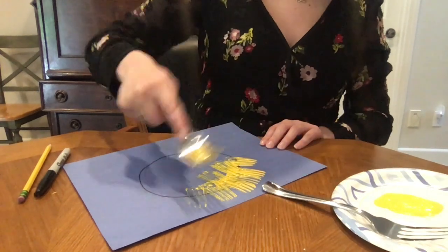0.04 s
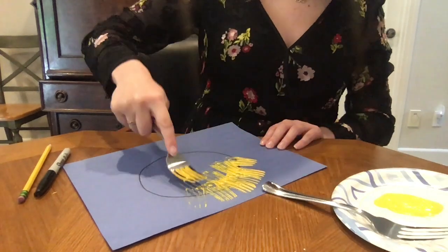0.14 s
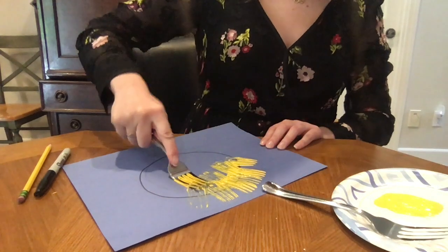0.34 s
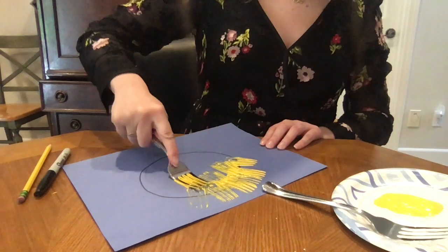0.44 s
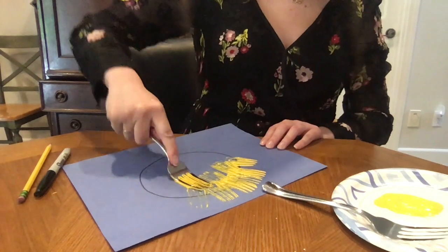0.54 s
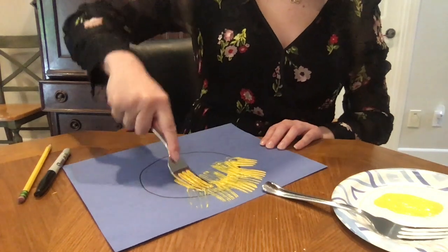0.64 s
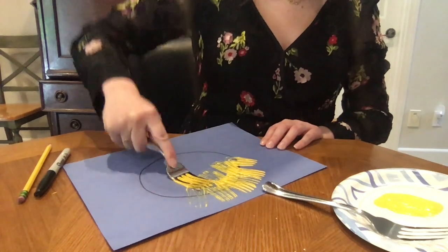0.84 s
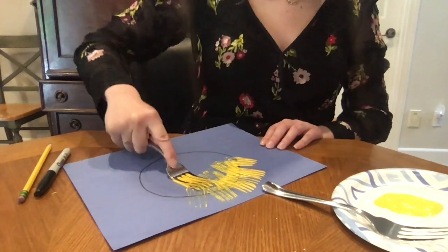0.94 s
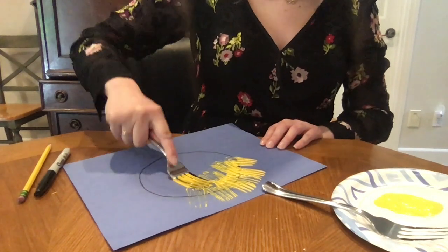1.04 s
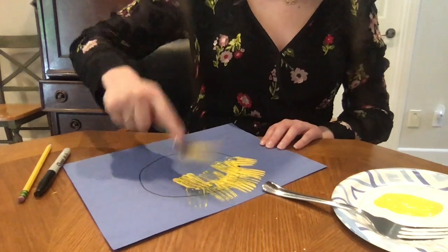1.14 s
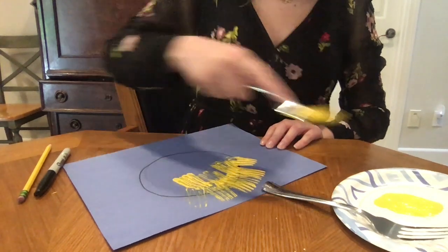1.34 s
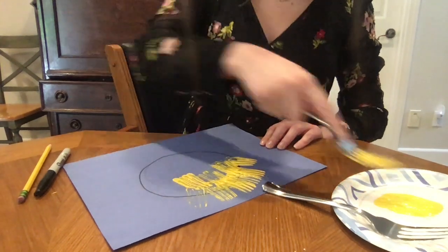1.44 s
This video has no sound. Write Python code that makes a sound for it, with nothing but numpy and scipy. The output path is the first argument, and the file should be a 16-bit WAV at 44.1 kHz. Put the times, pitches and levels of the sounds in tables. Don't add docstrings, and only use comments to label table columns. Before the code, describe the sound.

A paint-covered fork stamps through paper onto a wooden table at 0.22 s: a firm, short woody knock, softer tine touches within 0.03 s, and a faint ring of table and dishes. Much quieter, sticky paint peels in bright, fizzy crackles around 0.59, 0.8 and 1.07 s, with dull paper brushes near the last two. Close microphone, short room reflections, low ventilation rumble, barely audible sleeve rustle.

```python
import sys
import numpy as np
from scipy import signal
from scipy.fft import rfft, irfft, next_fast_len
from scipy.io import wavfile
from scipy.ndimage import uniform_filter1d, map_coordinates

SR = 44100
rng = np.random.default_rng(int(sys.argv[2]) if len(sys.argv) > 2 else 0)


def master(y):
    cut = np.clip(np.atleast_2d(y).T, -1, 1)
    pcm = np.round(cut * 32767)
    wavfile.write(sys.argv[1], SR, pcm.astype(np.int16))


def undo_db(level):
    steps = np.asarray(level, float) / 20
    return 10 ** steps


N = 66150
T = np.arange(N) / SR

# (f/Hz, density/dB per Hz)
RUMBLE_COLOUR = [(15, -36.5), (30, -17), (55, 1), (86, -5.5), (125, -1), (300, -6.5), (520, -16),
                 (900, -19.5)]
# (f/Hz, density/dB per Hz)
AIR_COLOUR = [(500, -29), (1000, -1), (1900, -7), (2500, -16.5), (3300, -26.5), (5000, -32), (14500, -30),
              (16000, -26)]
# (middle t/s, length t/s, level/dB)
SLEEVE_MOVES = [(.01, 0.062, -99), (.09, 0.017, -101), (.28, 0.023, -100), (.365, 0.022, -100),
                (.55, .04, -97), (1.337, 0.032, -101), (1.453, 0.082, -97.5)]
# (f/Hz, t60/s)
ROOM_DECAY = [(100, 0.35), (500, 0.26), (1300, .3), (2000, 0.29), (5000, 0.34), (14000, 0.5)]
# (f/Hz, level/dB)
WALL_COLOUR = [(80, -7.5), (230, 2), (520, 4), (1200, 3.5), (1800, -4.5), (3200, 6), (6000, -4)]
# (middle t/s, length t/s, level/dB, centre f/Hz)
FORK_SHIFTS = [
    (0.818, 0.024, -76.5, 1750),
    (1.081, 0.015, -68.5, 424),
]
# (start t/s, hold t/s, level/dB, release t60/s, low-end share level/dB)
PEELS = [
    (0.516, 0.014, -91.5, 0.13, -2),
    (0.592, 0.068, -72.5, 0.12, -6),
    (0.676, 0.24, -96, 0.25, -20),
    (0.8, 0.043, -77.5, 0.12, 1),
    (0.854, 0.016, -81, 0.18, -9),
    (1.068, 0.017, -71, 0.14, 0),
]
# (t/s, peak level/dB, lowest strong f/Hz)
PAINT_SNAPS = [(.5238, -65.5, 13600), (.5875, -70, 9000), (.5931, -48.5, 13300), (0.595, -58, 9050),
               (0.6098, -58, 9200), (.646, -58.5, 12000), (.655, -63, 7100), (.7945, -73, 3900),
               (.7995, -79, 12000), (.8105, -60, 12000), (.8186, -62.5, 4000), (.8233, -60, 13000),
               (.8545, -66, 13400), (.872, -63, 12000), (0.905, -74, 11000), (0.9074, -65, 11000),
               (1.0585, -73, 6950), (1.062, -56, 8100), (1.0652, -51, 10000), (1.072, -55, 11000),
               (1.0772, -51, 10000)]
# (f/Hz, density/dB per Hz)
PAINT_COLOUR = [(1200, -48), (1900, -9), (3700, -11.5), (5200, -16), (6200, -7.5), (11000, 1.5),
                (15300, 1.5), (16100, -29)]
# (f/Hz, width f/Hz, level/dB)
TINE_RESONANCES = [(1750, 650, -8), (5060, 610, -10)]
# (t/s, level/dB, brightness of the fork modes level/dB)
CONTACTS = [
    (.21862, 0, 0),
    (.23057, -13.5, -17),
    (.2525, -24, -20),
]
# (f/Hz, level/dB, t60/s, side of the nodal line +-1)
TABLE_MODES = [(141, -29, .074, 1), (214, -16, .019, -1), (274, -37, .17, 1), (375, -19, .022, 1),
               (434, -29, .053, 1), (512, -38, .062, 1), (708, -42, .1, -1), (947, -20, .01, 1),
               (1116, -28, .01, 1)]
# (f/Hz, level/dB, t60/s, side of the nodal line +-1)
FORK_MODES = [(1287, -30, .01, 1), (1577, -28, .017, -1), (1706, -22, .014, -1), (1883, -21, .01, 1),
              (2106, -27, .014, -1), (2644, -41, .016, -1)]
# (f/Hz, level/dB, t60/s, side -1 to 1)
DISH_MODES = [(223.3, -42, 0.16, 1), (256, -42.5, .14, 1), (804, -54.5, 0.13, 0.9),
              (497.6, -46.5, 0.18, 0.89), (543, -48.5, 0.19, -0.67), (1380, -55.5, 0.1, 0.56)]
# (f/Hz, level/dB)
CRACK_COLOUR = [(1500, -5.5), (3300, 14.5), (4300, -4), (8000, -2), (15500, 0)]


def unit(x):
    return x / np.sqrt(np.mean(x ** 2) + 1e-20)


def along(points, hz):
    f, value = np.transpose(points)
    return np.interp(np.log(hz + 1), np.log(f + 1), value)


def filtered(x, gain):
    m = next_fast_len(N + 8192)
    return irfft(rfft(x, m) * gain(np.fft.rfftfreq(m, 1 / SR)), m)[:N]


def noise_through(gain):
    return unit(filtered(rng.standard_normal(N), gain))


def wobble(rate):
    return map_coordinates(rng.standard_normal(200), [T * rate])


def bumps(moves):
    return sum(undo_db(db) * np.exp(-((T - s) / length) ** 2) for s, length, db in moves)


def room_tone():
    rumble = noise_through(lambda hz: undo_db(along(RUMBLE_COLOUR, hz)) / (1 + (hz / 1100) ** 4))
    air = noise_through(lambda hz: undo_db(along(AIR_COLOUR, hz)) * (hz > 300))
    return undo_db(-62) * rumble + undo_db(-80 + 1.2 * wobble(5.1)) * air


def sleeve():
    cloth = noise_through(lambda hz: (hz < 15800) / (1 + (11000 / (hz + 1)) ** 4))
    return bumps(SLEEVE_MOVES) * undo_db(5.5 * wobble(40)) * cloth


def room(x):
    delay_s = 0.0095
    hz, t, z = signal.stft(rng.standard_normal(SR // 2), SR, nperseg=256)
    decay_db = -60 * t / along(ROOM_DECAY, hz)[:, None]
    tail = signal.istft(z * undo_db(decay_db), SR, nperseg=256)[1]
    x = filtered(x, lambda f: undo_db(along(WALL_COLOUR, f)))
    delayed = np.pad(x, (round(delay_s * SR), 0))
    return signal.fftconvolve(delayed, tail / np.linalg.norm(tail))[:N]


def fork_shifts():
    out = np.zeros(N)
    for s, length, db, centre in FORK_SHIFTS:
        brush = noise_through(lambda hz: 1 / (1 + ((hz - centre) / (0.3 * centre) * 2) ** 2))
        out += bumps([(s, length, db)]) * brush
    return out


def paint_pops():
    pops_per_s, spread_db, pop_cycles = 1400, 6, 5.6
    sizes = undo_db(spread_db * rng.standard_normal(N).clip(-3, 1.5))
    hits = (rng.random(N) < pops_per_s / SR) * sizes
    life = np.exp(-T[:120] * 30000 / pop_cycles)
    power = signal.fftconvolve(hits ** 2, life ** 2)[:N].clip(0)
    return unit(np.sqrt(power) * rng.standard_normal(N))


def tine_gain(hz):
    return sum(undo_db(db) / (1 + ((hz - centre) / width * 2) ** 2) * np.sqrt(SR / width / 4)
               for centre, width, db in TINE_RESONANCES)


def peels():
    low_hz, mid_hz, hiss_db, rise_s = 6100, 10000, -6, 0.005
    low_fade_rate, mid_fades_faster = 1, 1.05
    tines_grow, tines_fade_db_per_s = 2, 60
    pops = paint_pops()
    active = sum((T < s + hold) * (T > s - hold) * 1. for s, hold, *_ in PEELS).clip(0, 1)
    hiss_share = undo_db(hiss_db) ** uniform_filter1d(active, size=800)
    raw = np.sqrt(1 - hiss_share.clip(0, 1) ** 2) * pops + hiss_share * rng.standard_normal(N)
    raw = unit(filtered(raw, lambda hz: undo_db(along(PAINT_COLOUR, hz))))
    low = filtered(raw, lambda hz: 1 / (1 + (hz / low_hz) ** 6))
    below_mid = filtered(raw, lambda hz: 1 / (1 + (hz / mid_hz) ** 6))
    tines = filtered(unit(pops + rng.standard_normal(N)), tine_gain)
    out = np.zeros(N)
    for s, hold, db, t60, low_db in PEELS:
        rise = np.exp(np.minimum(T - s, 0) / rise_s)
        fall_db = -60 * np.maximum(T - s - hold, 0) / t60
        tine_fade_db = tines_fade_db_per_s * np.maximum(T - s - .02, 0)
        peel = undo_db(fall_db) * (raw - below_mid)
        peel += undo_db(low_db / 2 + mid_fades_faster * fall_db) * (below_mid - low)
        peel += undo_db(low_db + low_fade_rate * fall_db) * low
        peel += undo_db(tines_grow * low_db + fall_db - tine_fade_db) * tines
        out += rise * undo_db(db) * peel
    return out


def snaps():
    t60_s, gain_db = .0055, 0.5
    out, t = np.zeros(N), T[:400]
    for s, db, edge_hz in PAINT_SNAPS:
        band = signal.butter(2, [edge_hz, 15900], "band", fs=SR, output="sos")
        snap = signal.sosfilt(band, undo_db(-60 * t / t60_s) * rng.standard_normal(len(t)))
        out[round(s * SR):][:len(t)] += undo_db(db + gain_db) * snap / np.abs(snap).max()
    return out


ATTACK_S = .002


def ring(modes, t):
    t = np.maximum(t, 0)
    press = 1 - np.exp(-(t / ATTACK_S) ** 2)
    return press * sum(side * undo_db(db - 60 * t / t60) * np.sin(2 * np.pi * hz * t)
                       for hz, db, t60, side in modes)


def paper_touch(after):
    swell = np.exp(np.minimum(after, 0) / 0.0018) * (after < 0)
    return undo_db(-44) * swell * np.sin(2 * np.pi * 2030 * after)


def crack(after):
    t = np.maximum(after, 0)
    noise = filtered(rng.standard_normal(N), lambda hz: undo_db(along(CRACK_COLOUR, hz)))
    return undo_db(-69.5 - 60 * t / 0.13) * (1 - np.exp(-t / 0.00027)) * noise


def dishes(after):
    lag_s, swell_s = 0.027, 0.014
    late = np.maximum(after - lag_s, 0)
    return (1 - np.exp(-late / swell_s)) * ring(DISH_MODES, late)


def table_legs(after):
    u = np.maximum(after, 0) / .027
    return undo_db(-33) * u ** 2 * np.exp(-u * 2) * np.sin(2 * np.pi * 52 * T)


def stamp():
    out = np.zeros(N)
    for s, db, bright_db in CONTACTS:
        out += undo_db(db) * (undo_db(bright_db) * ring(FORK_MODES, T - s) + ring(TABLE_MODES, T - s))
    after = T - CONTACTS[0][0] - ATTACK_S / 2
    return out + paper_touch(after) + crack(after) + dishes(after) + table_legs(after)


def scene():
    knock = stamp()
    paint = peels() + snaps()
    walls = room(undo_db(-14) * knock + undo_db(-21) * paint)
    return (room_tone() + sleeve() + walls + fork_shifts() + paint + knock)[None]


def roll_off(x):
    return signal.sosfilt(signal.butter(12, 16390, fs=SR, output="sos"), x)


def record(dry):
    top_hz, fade_s = 16000, .004
    peak_hz, peak_width_hz, peak_db = 15500, 490, 3
    faded = dry[0] * ((N / SR - T) / fade_s).clip(0, 1)
    limited = filtered(faded, lambda hz: 1 / (1 + (hz / top_hz) ** 60))
    heard = filtered(limited, lambda hz: undo_db(peak_db * np.exp(-((hz - peak_hz) / peak_width_hz) ** 2)))
    return roll_off(heard[None])


dry = scene()
out = record(dry)
master(out)
```